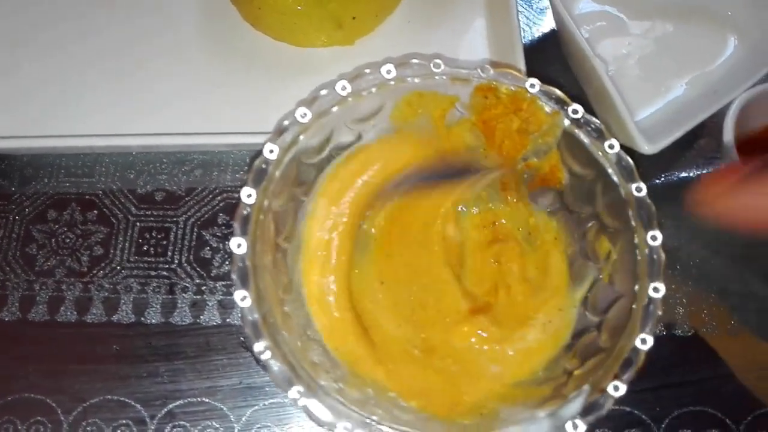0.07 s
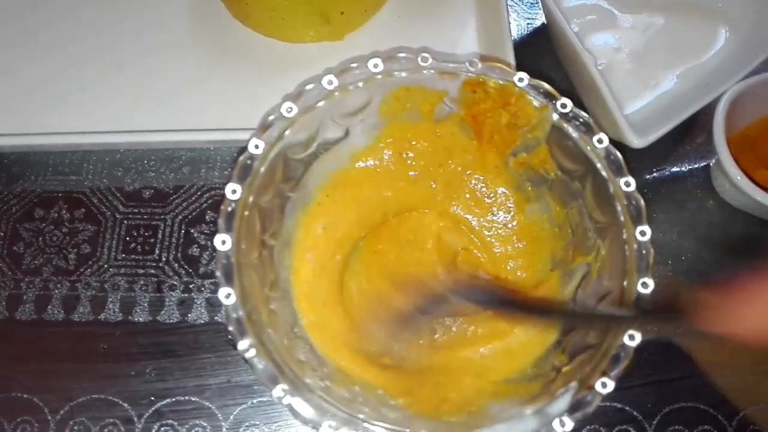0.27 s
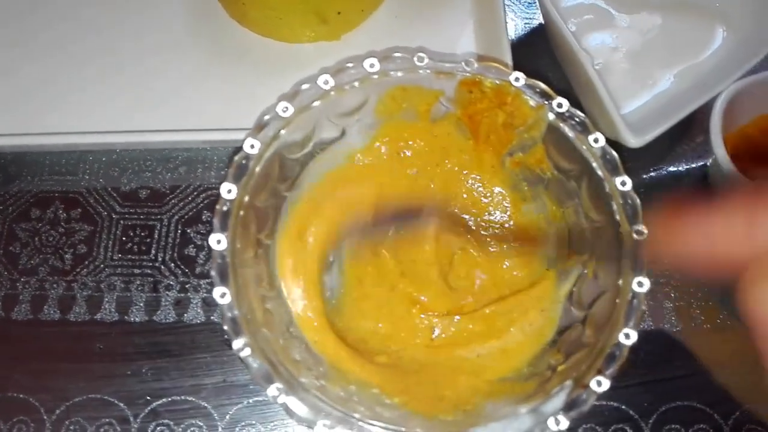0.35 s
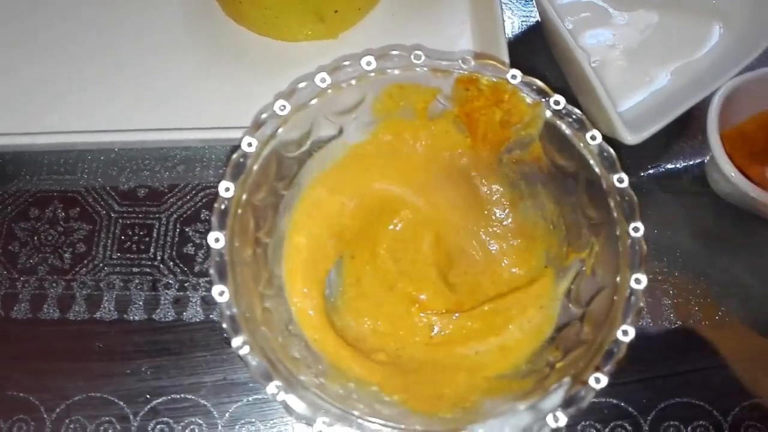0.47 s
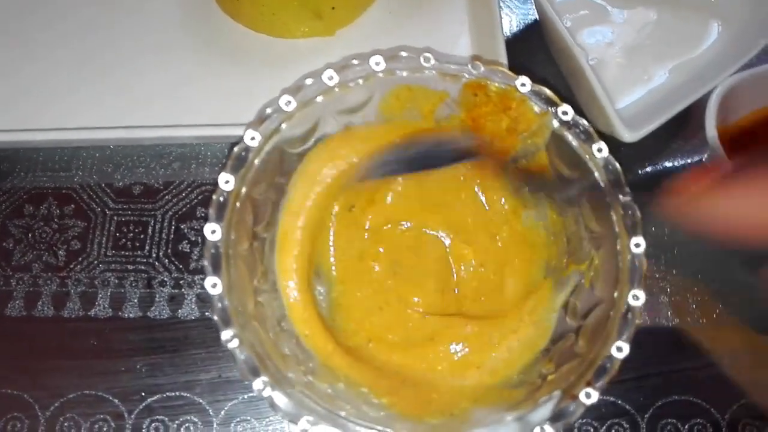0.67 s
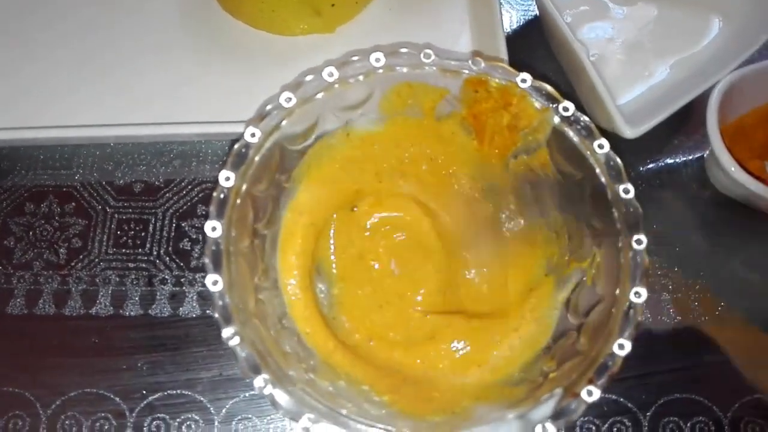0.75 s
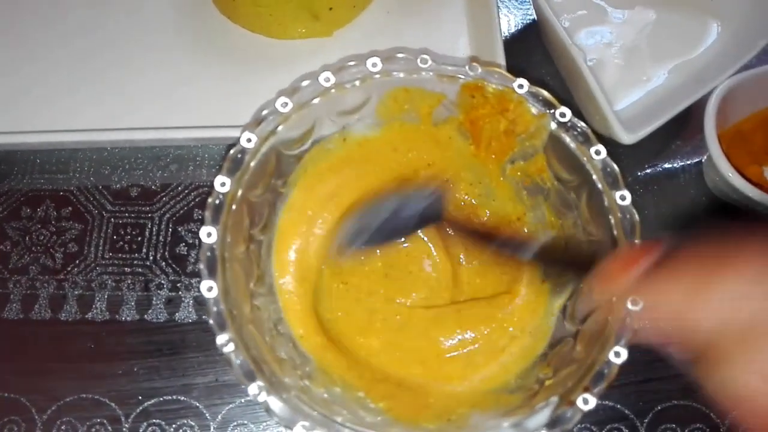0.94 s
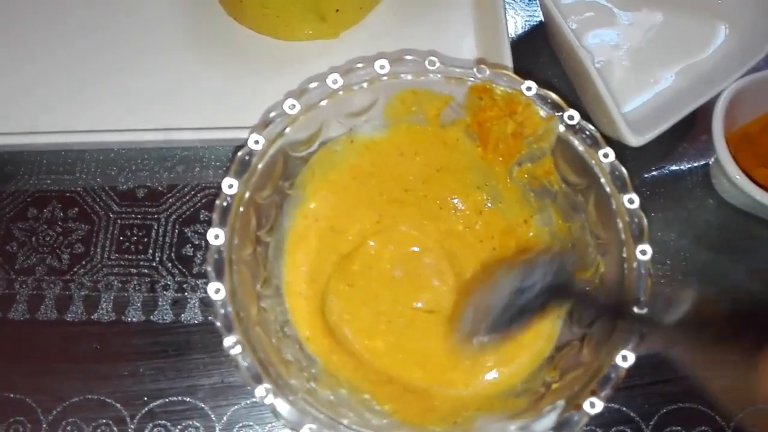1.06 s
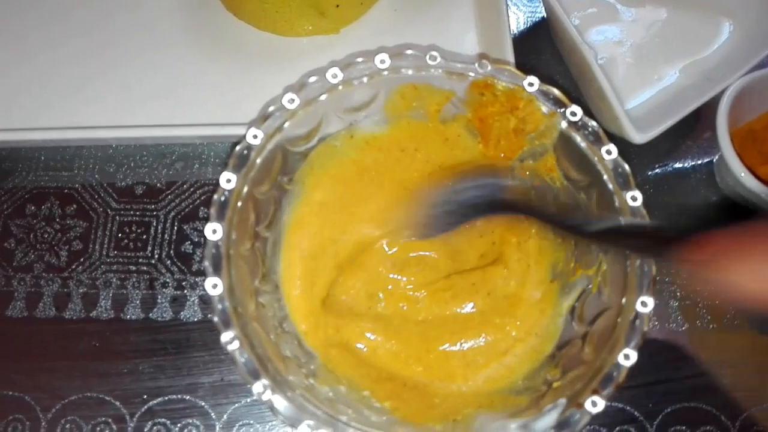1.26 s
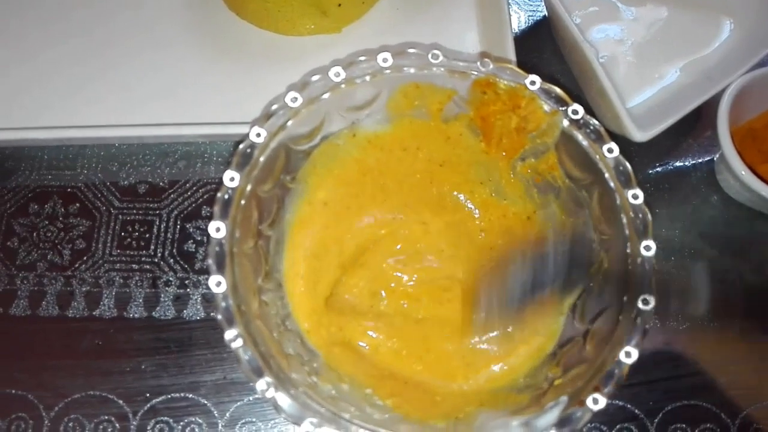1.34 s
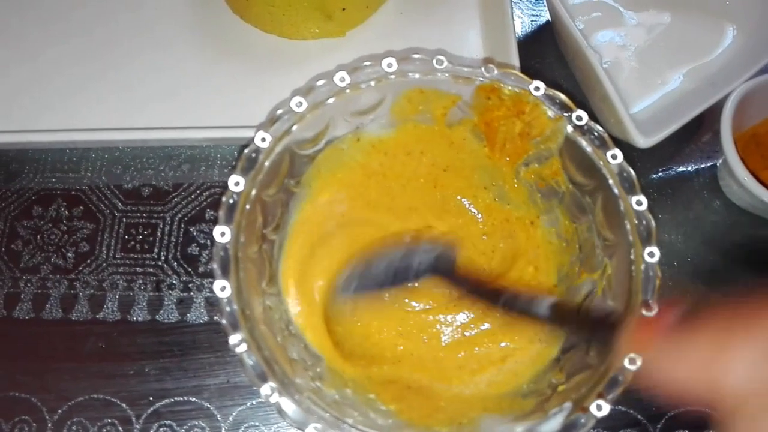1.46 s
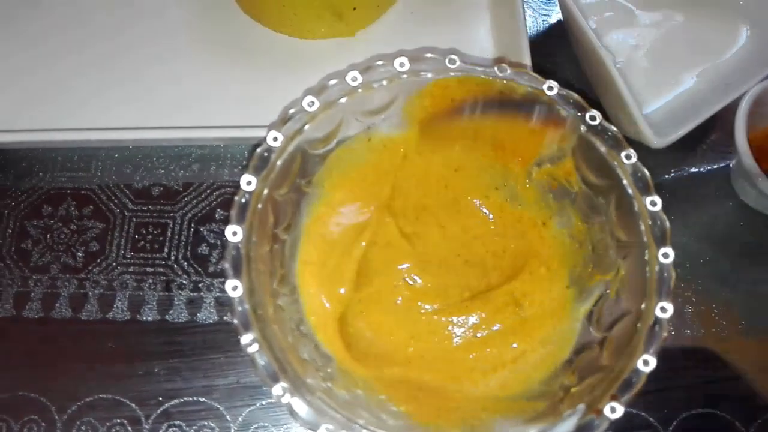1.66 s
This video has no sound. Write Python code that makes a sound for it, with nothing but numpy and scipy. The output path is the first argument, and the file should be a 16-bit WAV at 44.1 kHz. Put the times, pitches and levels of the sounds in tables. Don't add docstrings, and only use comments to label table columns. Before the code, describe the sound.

A metal spoon stirs thick paste in a small glass bowl, clinking, skipping and scraping

```python
import sys
import numpy as np
from scipy import signal
from scipy.fft import rfft, irfft
from scipy.io import wavfile
from scipy.ndimage import uniform_filter1d

SR = 44100
rng = np.random.default_rng(int(sys.argv[2]) if len(sys.argv) > 2 else 0)


def materialize(psi):
    bounded = np.clip(np.atleast_2d(psi).T, -1, 1)
    quanta = np.round(bounded * 32767).astype(np.int16)
    wavfile.write(sys.argv[1], SR, quanta)


def nominal_scale(level):
    x = np.asarray(level, float) / 20
    return 10 ** x


N = 74970

# start_s, level_db, pitch_hz, contact_ms, crackle_db (crackle that follows)
CLINKS = [
    (.439, -5, 2020, 4.1, -29),
    (0.649, -25.5, 3460, 4.6, -40.5),
    (.729, -4.5, 2320, 3.96, -28.5),
    (1.298, -15.5, 3510, 1.02, -42),
    (1.425, -10.5, 3500, 4.1, -65),
]
# start_s, level_db, pitch_hz,
# contact_ms
SKIPS = [(0.004, -27.5, 3460, 6.1), (0.064, -34.5, 3160, 8.8), (0.089, -36, 3440, 9.3),
         (0.132, -32, 2060, 3.5), (0.192, -37.5, 3300, 2.4), (0.2, -30, 3480, 3.5),
         (0.205, -29.5, 4440, 4.35), (0.213, -19.5, 3700, 5.4), (0.25, -27, 3600, 8),
         (0.257, -20.5, 3120, 5.2), (0.275, -16, 3580, 4.7), (0.314, -32.5, 2600, 7.),
         (0.452, -23.5, 1870, 3.4), (0.458, -40, 2280, 1.7), (0.466, -20, 3730, 1.8),
         (0.469, -24, 1490, 2.), (0.52, -32, 3300, 3.1), (0.547, -26.5, 1640, 5.8),
         (0.567, -15.5, 4940, 3.65), (0.684, -33, 1500, 11), (0.695, -41.5, 2110, 3.7),
         (0.747, -27.5, 1850, 4.0), (0.759, -30, 3100, 8.1), (0.771, -25, 3440, 5.5),
         (0.795, -24.5, 3500, 4), (0.808, -19, 3580, 1.3), (0.84, -27, 3340, 6.6),
               (0.862, -19.5, 4800, 2.53), (0.896, -26.5, 3015, 8.2), (0.912, -31, 3440, 8.2),
               (1.149, -26.5, 2290, 1.4), (1.157, -25.5, 2690, 5.7), (1.174, -20.5, 3320, 5.1),
               (1.197, -34.5, 2370, 1.6), (1.317, -18, 2540, 3.24), (1.333, -19.5, 3400, 3.1),
               (1.342, -20.5, 2730, 3.7), (1.358, -29.5, 3480, 7.4), (1.369, -33, 3230, 2.2),
               (1.393, -29, 2930, 4.4), (1.413, -21.5, 2620, 1.9), (1.436, -29.5, 3400, 2),
         (0.444, -18, 1910, 1.6), (0.447, -30, 2300, 0.79), (0.460, -19.5, 3920, 2.5),
               (0.477, -21.5, 3540, 2), (0.489, -36, 1380, 1.3), (0.738, -28, 2340, 1.1),
               (0.754, -24, 2520, 4.6), (0.762, -40, 2600, 2.8), (0.781, -32, 3160, 2.),
               (0.79, -37, 3300, 1.7), (1.028, -43, 3300, 1.05), (1.144, -30.5, 2470, 9),
               (1.172, -23.5, 2620, 2.7), (1.203, -51, 1735, 3.), (1.305, -38, 3200, 4.4),
               (1.319, -39, 6070, 2.2), (1.322, -26.5, 2300, 4.5), (0.215, -18, 6050, 4.1),
               (1.33, -23.5, 2560, 9), (1.335, -24, 6330, 2.7), (1.384, -29, 1580, 6),
               (1.404, -31, 3300, 3.6), (1.411, -25, 2550, 3.), (1.416, -23, 2310, 3.8),
               (1.435, -25, 3320, 1.6), (1.671, -54, 6470, 4.1)]
# start_s, level_db, pitch_hz, contact_ms
SLAPS = [
    (1.013, -18.5, 3270, 1.3),
    (1.014, -20.5, 2050, 2.3),
    (1.019, -9, 3500, 1.18),
    (1.0222, -15.5, 3600, .9),
]
# start_s, level_db, pitch_hz, contact_ms
KNOCKS = [(0.401, -40.5, 1060, 4.), (0.96, -36, 1050, 12), (0.98, -46, 1100, 3.9), (1.001, -41.5, 2200, 14),
          (1.034, -29.5, 1060, 2.8), (1.126, -39, 1230, 13), (1.185, -32, 1410, 7.7),
          (1.229, -35.5, 1110, 12), (1.635, -38, 1110, 10.7), (1.668, -42.5, 1840, 2.1),
          (1.694, -29, 945, 7.1), (0.213, -27, 850, 6.5), (0.335, -42.5, 720, 7.1), (0.655, -45, 807, 5.),
          (1.205, -37.5, 707, 8), (1.318, -36.5, 920, 4.9), (1.335, -28.5, 912, 6.4)]
# pitch_hz, level_db, fade_s (time to fall 60 dB)
BOWL = [(1141, -1.5, 0.046), (1267, -4.5, 0.079), (1538, -4, 0.13), (1662, -3.5, 0.1), (1850, -1.5, 0.15),
        (2273, 8, 0.024), (2520, -2, 0.05), (2800, -4, 0.12), (3456, -24, 0.0081), (3460, -0.5, 0.069),
        (4620, -12.5, 0.034), (4786, 0.5, 0.028), (5800, -2.5, 0.021), (6440, -34, 0.037)]
# pitch_hz, level_db, fade_s
HIGH_BOWL = [(3730, -18, 0.014), (7110, -5, 0.013), (8570, -29, 0.0083), (10050, -22.5, 0.0082),
             (10700, -31.5, 0.0057)]
# pitch_hz, level_db (per Hz)
CRACK_COLOUR = [(88, -35.5), (150, -29.5), (2400, 7.5), (4760, 2), (5680, -7), (6910, 0.5), (8400, -31),
                (14200, -29.5), (16000, -46.5)]
# time_s, level_db
DRAG = [(0, -47), (.12, -53), (.236, -66), (.38, -62.5), (.52, -46.5), (.63, -60.5), (.7, -62), (.8, -38),
        (.95, -55.5), (1.13, -51.5), (1.28, -88), (1.305, -52), (1.42, -51), (1.46, -72), (1.625, -78.5),
        (1.64, -55.5), (1.7, -45.5)]
# start_s, level_db
HANDLE_RINGS = [
    (0.133, -52.5),
    (.148, -48.5),
    (.568, -51.5),
]
# pitch_hz, level_db, fade_s
SPOON = [(1720, -12, .12), (4210, 0, .25), (7740, -6, .045), (12050, -16, .03)]
# start_s, level_db, pitch_hz
THUDS = [
    (0.434, -45, 350),
    (0.731, -43, 377),
    (1.016, -40.5, 334),
    (1.187, -46, 313),
    (1.69, -52, 324),
    (1.298, -50, 150),
]
# time_s, level_db
SHOVE = [(0, -63), (.19, -65), (.39, -69), (.47, -55.5), (.62, -72.5), (.77, -58), (.87, -63),
         (1.05, -58.5), (1.2, -58.5), (1.4, -58.5), (1.5, -73.5), (1.6, -77.5), (1.7, -53.5)]
# pitch_hz, fade_s
ROOM_FADE = [(600, .15), (1300, .29), (3000, .3), (8000, .23)]
# pitch_hz, level_db
ROOM_COLOUR = [(500, 6), (1500, 1.5), (3500, -6.5), (5000, -11), (12000, -3)]
# pitch_hz, level_db (per Hz)
AIR = [(53, -33), (90, -3), (114, -16), (620, -45.5), (1680, -38), (3430, -44.5), (4260, -40), (13500, -41),
       (16000, -61.5)]
# time_s, pitch_hz, level_db
HUM = [(0.0, 55, -67), (0.052, 52.6, -71), (0.164, 50.5, -56.5), (0.382, 49.56, -62.5), (0.458, 53, -55),
       (0.534, 54.4, -61), (0.548, 54, -61.5), (0.714, 51, -60), (0.742, 53.3, -54), (0.894, 51.5, -58.5),
       (1.334, 51.7, -59), (1.452, 51.1, -62), (1.618, 50, -58.5), (1.7, 54.3, -60)]

SPOT_FADE_S = 0.011
PLACE_DB, DETUNE = 3, 0.025
SKIP_DAMPING = 0.62
SCRAPE_DB, SCRAPE_SLIPS_PER_S = -4.5, 3300
GRIT_FADE_S, GRIT_SLIPS_PER_S = 0.16, 1000
THUD_FADE_S = 0.057
ROOM_DB, AIR_DB = -14.5, -73
LOW_CUT_HZ, HIGH_CUT_HZ = 34, 16300


def evened(x):
    return x / np.sqrt(np.mean(x ** 2) + 1e-20)


def read(points, hz):
    f, value = np.transpose(points)
    return np.interp(np.log(hz + 1), np.log(f + 1), value)


def along(curve):
    return nominal_scale(np.interp(np.arange(N) / SR, *np.transpose(curve)))


def add(mix, start_s, sound):
    part = mix[max(round(start_s * SR), 0):][:len(sound)]
    part += sound[:len(part)]


def ring(modes, extra_db, size=4096):
    hz, db, fade_s = np.transpose(modes)[:, :, None]
    t = np.arange(size) / SR
    level_db = db + np.reshape(extra_db, (-1, 1)) - 60 * t / np.maximum(fade_s, 0.004)
    return (nominal_scale(level_db) * np.sin(2 * np.pi * hz * t)).sum(0)


def crack():
    log_gain = read(CRACK_COLOUR, abs(np.fft.fftfreq(2048, 1 / SR))) * np.log(10) / 20
    spectrum = np.exp(log_gain - 1j * signal.hilbert(log_gain).imag)
    click = np.fft.ifft(spectrum).real[:1024]
    return click / abs(click).max()


def with_crack(body, crack_db):
    return body + nominal_scale(crack_db) * np.pad(crack(), (0, 3072))


def contacts(table, crack_db, tilt_db, rise, damping, focus_db, focus_octaves, spot_db):
    modes, out = np.array(BOWL + HIGH_BOWL), np.zeros(N)
    t_ms = np.arange(600) / SR * 1000
    for start_s, db, hz, contact_ms, *_ in table:
        u = t_ms / max(contact_ms, 0.3)
        pure_db = 12 * np.exp(-(contact_ms / 1.3) ** 2)
        strength = 0.16 + (abs(rng.standard_normal(600)) > 1.6)
        envelope = np.minimum(u / rise + 0.15, 1) * np.exp(-u ** 2)
        slips = rng.standard_normal(600) * strength * envelope

        place, detune = rng.standard_normal((2, len(modes)))
        octaves = np.log2(modes[:, 0] / hz)
        colour_db = (focus_db + pure_db) * np.exp(-(octaves / focus_octaves) ** 2)
        colour_db += PLACE_DB * place + tilt_db * np.maximum(octaves, 0)
        tuned = modes.copy()
        tuned[:, 0] *= 1 + DETUNE * detune
        tuned[:, 2] *= damping
        body = ring(tuned, colour_db)
        spot = ring([(hz, spot_db + pure_db, SPOT_FADE_S)], 0)
        touched = with_crack(body / abs(body).max() + spot, crack_db - pure_db)
        sound = signal.fftconvolve(slips, touched)
        add(out, start_s, nominal_scale(db) * sound / abs(sound).max())
    return out


def clinks():
    return contacts(CLINKS, crack_db=7, tilt_db=12.5, rise=0.14, damping=0.76,
                    focus_db=8, focus_octaves=0.29, spot_db=-8)


def skips():
    return contacts(SKIPS, crack_db=0, tilt_db=6, rise=0.17,
                    damping=SKIP_DAMPING, focus_db=14.5, focus_octaves=0.48, spot_db=-6.5)


def slaps():
    return contacts(SLAPS, crack_db=3.5, tilt_db=3, rise=0.05, damping=0.5,
                    focus_db=5, focus_octaves=0.2, spot_db=-1)


def slipping(per_s, clump_db, spread_db, tilt_db, crack_db, damping):
    clumps_db = clump_db * evened(uniform_filter1d(rng.standard_normal(N), 200))
    happens = rng.random(N) < per_s / SR
    direction = np.sign(rng.standard_normal(N))
    slips = happens * direction * nominal_scale(clumps_db + spread_db * rng.standard_normal(N))
    modes = np.array(BOWL + HIGH_BOWL) * [1, 1, damping]
    body = ring(modes, tilt_db * np.log2(modes[:, 0] / 1000))
    body = with_crack(body / abs(body).max(), crack_db)
    return evened(signal.fftconvolve(slips, body)[:N])


def scrape():
    rub = slipping(SCRAPE_SLIPS_PER_S, clump_db=0.5, spread_db=4.5, tilt_db=-8.5, crack_db=-34, damping=0.26)
    return nominal_scale(SCRAPE_DB) * along(DRAG) * rub


def grit():
    drive, t = np.zeros(N), np.arange(9000) / SR
    for start_s, *_, crackle_db in CLINKS:
        add(drive, start_s + 0.0012, nominal_scale(crackle_db - 60 * t / GRIT_FADE_S))
    return drive * slipping(GRIT_SLIPS_PER_S, clump_db=4, spread_db=3, tilt_db=-10.5, crack_db=1.5, damping=0.71)


def handle():
    out = np.zeros(N)
    fade = np.cos(np.linspace(0, np.pi / 2, 3000))
    for start_s, db in HANDLE_RINGS:
        waver = nominal_scale(2.5 * evened(uniform_filter1d(rng.standard_normal(3000), 300)))
        add(out, start_s, nominal_scale(db) * waver * ring(SPOON, 0, size=3000) * fade)
    return out


def knocks():
    return contacts(KNOCKS, crack_db=-30, tilt_db=-14, rise=0.2, damping=0.35,
                    focus_db=6, focus_octaves=0.6, spot_db=-3)


def thuds():
    out = np.zeros(N)
    soft_start = np.minimum(np.arange(4096) / 62, 1)
    for start_s, db, hz in THUDS:
        bowl_push = [(hz, 0, THUD_FADE_S), (hz, -3, 0.03), (0.86 * hz, -4, 0.04)]
        table_jolt = [(135, -1, 0.09), (62, -3, 0.2)]
        add(out, start_s, nominal_scale(db) * ring(bowl_push + table_jolt, 0) * soft_start)
    return out


def rumble():
    hz = np.fft.rfftfreq(N, 1 / SR)
    shape = np.exp(-((hz - 72) / 40) ** 2)
    shape += nominal_scale(-5.5) * np.exp(-((hz - 160) / 44) ** 2)
    shape += nominal_scale(-19.5) * (hz / 90) ** 3 / (1 + (hz / 143) ** 3) / (1 + (hz / 610) ** 3)
    return along(SHOVE) * evened(irfft(rfft(rng.standard_normal(N)) * shape, N))


def room(x):
    taps = np.zeros((3, SR // 2))
    at = np.arange(120, SR // 2 - 20, 20)
    places = at + rng.integers(0, 20, (3, len(at)))
    np.put_along_axis(taps, places, rng.choice([-1.0, 1.0], (3, len(at))), 1)
    hz, t, z = signal.stft(taps, SR, nperseg=256)
    fade_db = read(ROOM_COLOUR, hz)[:, None] - 60 * t / read(ROOM_FADE, hz)[:, None]
    tail = signal.istft(z * nominal_scale(fade_db), SR, nperseg=256)[1]
    phase = 90 * np.arange(N) / SR + np.arange(3)[:, None] / 3
    turns = np.cos(2 * np.pi * phase) * np.sqrt(2 / 3)
    return signal.fftconvolve(x * abs(turns), tail / np.linalg.norm(tail[0]), axes=1).sum(0)[:N]


def air():
    hz = np.fft.rfftfreq(N, 1 / SR)
    wash = irfft(rfft(rng.standard_normal(N)) * nominal_scale(read(AIR, hz)) * (hz > 75), N)
    return nominal_scale(AIR_DB) * evened(wash)


def hum():
    time_s, pitch_hz, level_db = np.transpose(HUM)
    t = np.arange(N) / SR
    smooth = uniform_filter1d(uniform_filter1d(rng.standard_normal(N), 1200), 1200)
    tone = np.sqrt(2) * np.sin(2 * np.pi * np.cumsum(np.interp(t, time_s, pitch_hz)) / SR)
    return nominal_scale(np.interp(t, time_s, level_db) + 3 * evened(smooth)) * tone


def scene():
    glass = clinks() + skips() + slaps() + scrape() + grit() + handle() + knocks()
    thin = signal.butter(2, 650, "high", fs=SR, output="sos")
    near = signal.sosfilt(thin, glass) + thuds()
    return (near + nominal_scale(ROOM_DB) * room(near) + rumble() + air() + hum())[None]


def band_limit(x):
    return signal.sosfilt(signal.butter(12, 16840, fs=SR, output="sos"), x)


def record(dry):
    high_cut = signal.firwin(255, HIGH_CUT_HZ, window=("kaiser", 9), fs=SR)
    low_cut = signal.butter(2, LOW_CUT_HZ, "high", fs=SR, output="sos")
    mix = signal.oaconvolve(dry, high_cut[None], "same")
    mix = signal.sosfilt(low_cut, mix)
    return band_limit(mix)


dry = scene()
out = record(dry)
materialize(out)
```